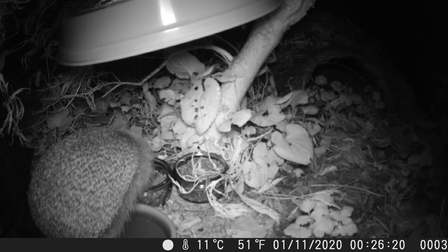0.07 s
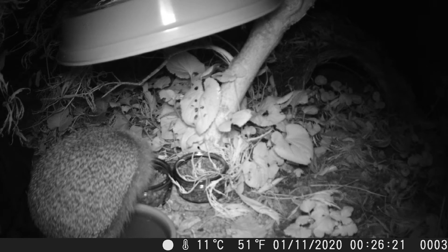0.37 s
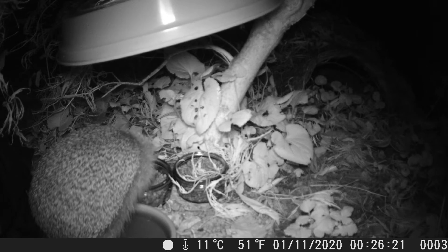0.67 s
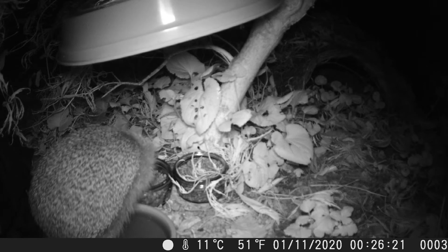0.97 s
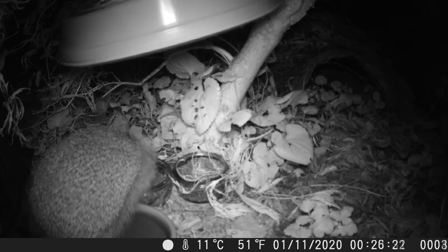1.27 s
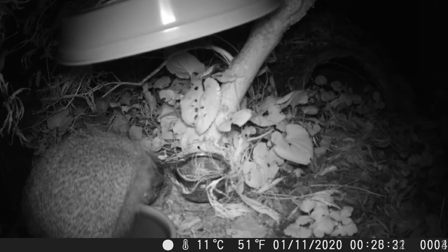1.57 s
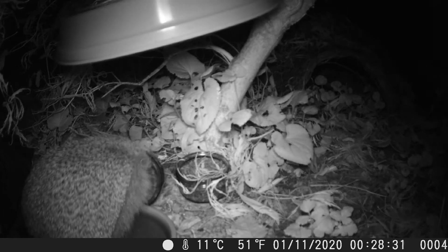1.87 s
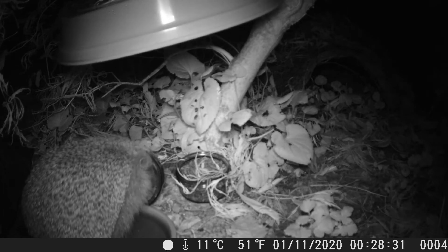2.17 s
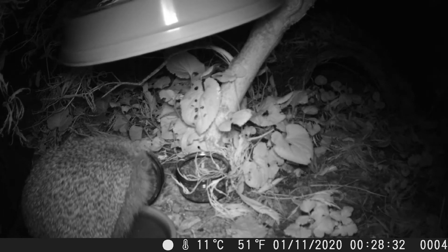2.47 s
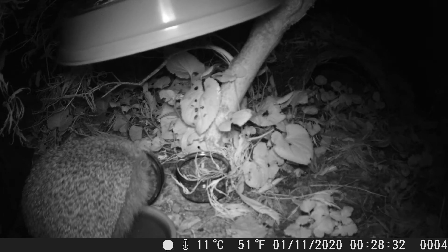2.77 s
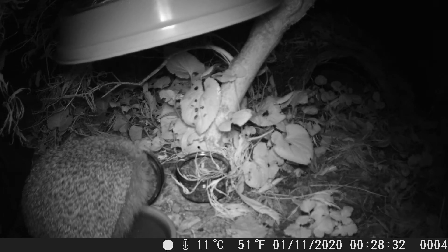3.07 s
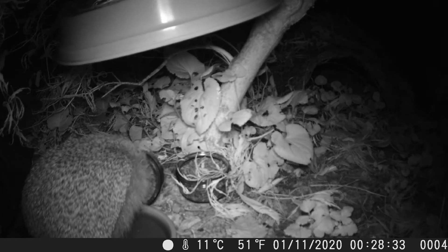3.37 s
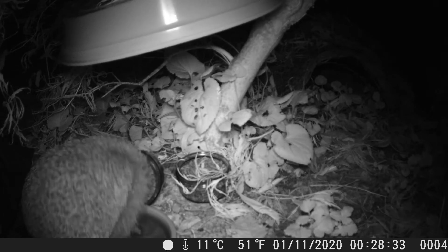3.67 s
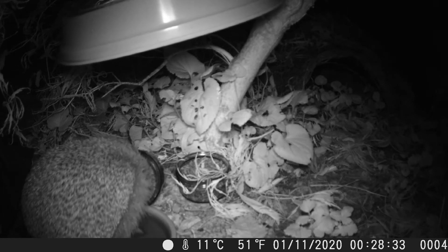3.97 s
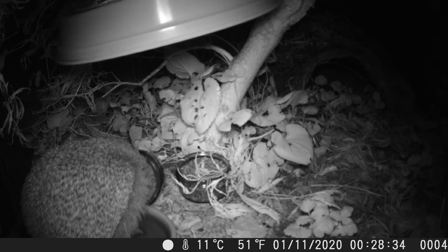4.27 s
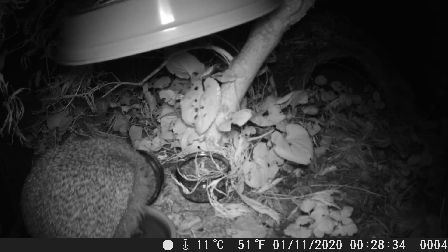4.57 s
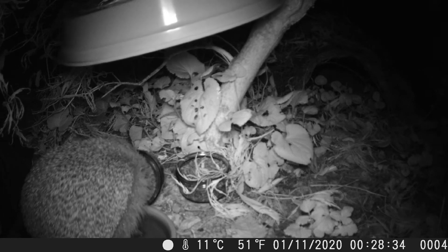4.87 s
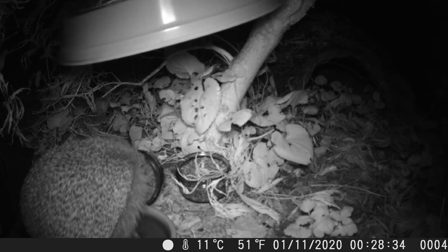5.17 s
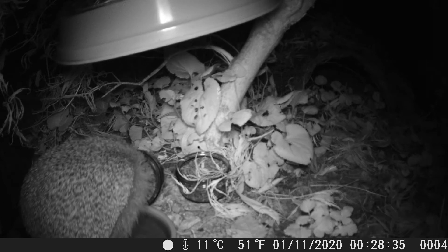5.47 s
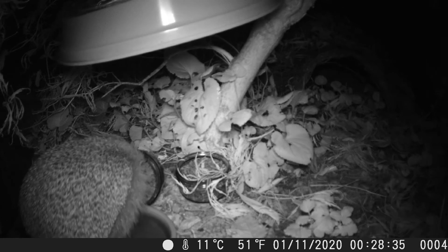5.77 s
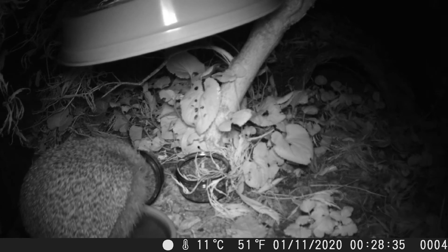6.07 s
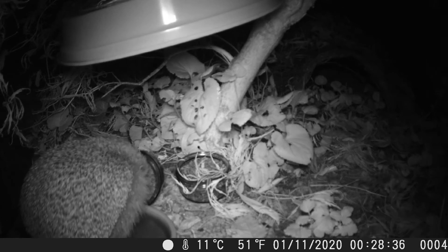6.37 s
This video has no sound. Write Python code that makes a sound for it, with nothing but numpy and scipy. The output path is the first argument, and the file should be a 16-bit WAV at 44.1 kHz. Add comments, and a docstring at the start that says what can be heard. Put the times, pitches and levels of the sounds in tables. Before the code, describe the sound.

A very quiet night garden is heard through a trail camera's microphone, with wavering low rumble and smooth hiss throughout. From the start, the camera's electronics make a soft thump and short buzz five times a second, with barely audible high peeps coming and going. A hedgehog feeds with tiny, irregular, high crunches and smacks, the sharpest at about 2.2, 2.7 and 3.4 seconds. Everything dips slightly around 1.3 seconds. From 1.7 to 3.5 seconds, deep, dull buffets hit the microphone, strongest near 2.3 seconds. Faint, brief hollow notes, like a nudged bowl, cluster from 2.3 to 3.2 seconds and return now and then. One bite ends in a tiny squeak at 3.4 seconds. From about 4 seconds the buzzes grow longer and repeatedly sink to a thinner, lower whine, while the pulsing and nibbling continue to the end at about 6.5 seconds.

```python
"""A trail camera watches a hedgehog at its food bowl in a still night garden, over rumble and hiss.
From the start the hedgehog makes tiny crunches and the camera's current draw leaks into its microphone:
a soft thump and a short buzz five times a second, with a thin peep on a clock of its own.
After a brief dip in level, low buffets come in at 1.7 s, then faint hollow notes; at 3.4 s a bite squeaks.
From about 4 s on, the buzz sinks to a whine whenever the writing of a picture stalls."""
import sys
import numpy as np
from scipy import signal
from scipy.fft import rfft, irfft
from scipy.io import wavfile
from scipy.ndimage import uniform_filter1d

SR = 44100
rng = np.random.default_rng(int(sys.argv[2]) if len(sys.argv) > 2 else 0)


def put_to_file(sound):
    """Save the sound as 16-bit audio at rate SR, in the file named by the first command-line argument."""
    columns = np.atleast_2d(sound).T  # one column per channel
    safe = np.clip(columns, -1, 1)
    whole_steps = np.round(safe * 32767)
    wavfile.write(sys.argv[1], SR, whole_steps.astype(np.int16))


N = 287091
TIME = np.arange(N) / SR


def undb(db):
    """Decibels to gain."""
    return 10 ** (np.asarray(db) / 20)


def unit_rms(x):
    """Scale to rms 1."""
    return x / np.sqrt(np.mean(x ** 2))


def automation(points):
    """Join (time_s, value) points by straight ramps."""
    return np.interp(TIME, *np.transpose(points))


def add(out, start_s, sound):
    """Mix a sound into out at start_s."""
    i = max(int(start_s * SR), 0)
    out[i:i + len(sound)] += sound[:max(N - i, 0)]


def resonate(x, hz, width_hz):
    """Two-pole band-pass, gain 1 at the centre."""
    return signal.lfilter(*signal.iirpeak(hz, hz / width_hz, fs=SR), x)


def noise(eq):
    """Noise of rms 1, coloured by (freq_hz, gain_db) points."""
    hz, db = np.transpose(eq)
    bins_hz = np.maximum(np.fft.rfftfreq(N, 1 / SR), 1)
    gain = undb(np.interp(np.log(bins_hz), np.log(hz), db))
    return unit_rms(irfft(rfft(rng.standard_normal(N)) * gain, N))


def wobble(rate_hz):
    """Random modulator of rms 1: sample and hold, smoothed twice."""
    hold = int(SR / rate_hz)
    steps = np.repeat(rng.standard_normal(N // hold + 1), hold)
    return unit_rms(uniform_filter1d(uniform_filter1d(steps, hold), hold)[:N])


def gate(start_s, end_s, edge_s):
    """Open between start and end, with a fade at each edge."""
    return np.clip(np.minimum(TIME - start_s, end_s - TIME) / edge_s, 0, 1)


def during(events, edge_s):
    """A gate that opens for each (start_s, length_s, ...) event."""
    return sum(gate(start, start + length, edge_s) for start, length, *_ in events)


def note(length_s, hz, fall):
    """A sine that swells and fades while it sinks by the share `fall` of its pitch."""
    progress = np.linspace(0, 1, int(length_s * SR))
    glide_hz = hz * (1 - fall * (progress - .5))
    return np.sin(np.pi * progress) ** 2 * np.sin(2 * np.pi * np.cumsum(glide_hz) / SR)


# EQ curves of the rumble and the hiss: freq_hz, gain_db
RUMBLE_EQ = [(10, -1), (20, 1.7), (32, 1), (50, -3.5), (65, -6.5), (85, -4), (120, -18), (170, -16.2),
             (215, -24.5), (260, -23), (400, -34.5), (700, -40), (1500, -66)]
HISS_EQ = [(100, -0.5), (500, 1.5), (1000, -4), (1800, -7.5), (2900, -11.4), (3220, -20), (3430, -15),
           (4100, -16.5), (4600, -19), (5100, -20), (6400, -20), (6900, -15), (7300, -25)]
# Fader ride on the rumble: time_s, level_db
RUMBLE_RIDE = [(0, -50.5), (.8, -51.8), (2.5, -50.6), (3.8, -51), (4.6, -50), (5.3, -50.5), (6.5, -48.8)]

def background(waver_db=1.2, hiss_db=-69.2):
    """The bed: wavering low rumble and smooth microphone hiss."""
    rumble = noise(RUMBLE_EQ) * undb(automation(RUMBLE_RIDE) + waver_db * wobble(9))
    return rumble + noise(HISS_EQ) * undb(hiss_db)


# Sub-heavy EQ curve of the buffets: freq_hz, gain_db
BUFFET_EQ = [(12, -5), (20, 3.5), (42, -1.5), (70, -11), (100, -19.5), (160, -41), (300, -77), (2000, -120)]
# Low buffets on the housing: peak_s, level_db
BUFFET_HITS = [(1.705, -49), (1.925, -47), (2.13, -36), (2.23, -36), (2.32, -29.3), (2.41, -41),
               (2.56, -47), (2.78, -47), (2.89, -37.5), (2.965, -35.8), (3.11, -44.5), (3.23, -49.5),
               (3.42, -48.5)]

def buffets(attack_s=.025, hold_s=.05, decay_s=.042):
    """Deep, dull knocks that swell, hold and die away, perhaps the animal jostling the camera's stand."""
    shake = noise(BUFFET_EQ)
    shake = shake / np.sqrt(uniform_filter1d(shake ** 2, SR // 12))  # levelled before the envelopes
    power = 0
    for peak_s, db in BUFFET_HITS:
        attack = np.clip(1 + (TIME - peak_s) / attack_s, 0, 1)
        release = np.exp(-np.maximum(TIME - peak_s - hold_s, 0) / decay_s)
        power = power + (undb(db) * attack * release) ** 2
    return shake * np.sqrt(power)


# Faint hollow notes: start_s, pitch_hz, level_db
HOLLOW_CUES = [(2.31, 685, -65.5), (2.42, 695, -70.5), (2.516, 690, -69.5), (2.635, 690, -67.5),
               (2.785, 690, -70), (2.815, 695, -72), (3.04, 690, -71.5), (3.127, 690, -69),
               (3.228, 710, -69), (3.852, 700, -69.5), (4.914, 675, -65), (5.523, 705, -66.5),
               (5.617, 695, -64), (6.193, 690, -65.5), (6.229, 685, -70), (6.32, 711, -60.5)]

def hollow_notes(length_s=.049, fall=.069, upper_ratio=1.2, upper_db=-10.5):
    """Two close resonances swell and fade together, perhaps the bowl as it is nudged."""
    out = np.zeros(N)
    for start_s, hz, db in HOLLOW_CUES:
        upper = undb(upper_db) * note(length_s, hz * upper_ratio, fall)
        add(out, start_s, undb(db) * (note(length_s, hz, fall) + upper))
    return out


# Peeps on a 0.216 s beat, with gaps: start_s, level_db
PEEP_CUES = [(.211, -88), (.436, -88), (.649, -84.5), (.862, -85.5), (1.08, -88), (1.93, -87),
             (2.147, -86.5), (2.362, -84.5), (2.584, -85), (2.798, -85), (3.015, -89), (3.231, -87),
             (3.445, -87), (3.658, -86), (3.878, -86), (4.095, -88.5), (5.173, -83), (6.036, -86),
             (6.25, -84.5), (6.464, -86)]

def peeps(length_s=.036, pitch_hz=5470):
    """Thin peeps of one pitch, probably from the camera's electronics."""
    out = np.zeros(N)
    for start_s, db in PEEP_CUES:
        add(out, start_s, undb(db) * note(length_s, pitch_hz, fall=.022))
    return out


def squeak(start_s=3.444, length_s=.018, pitch_hz=4940, level_db=-71):
    """One bite ends in a tiny high squeak as the food gives way."""
    out = np.zeros(N)
    add(out, start_s, undb(level_db) * note(length_s, pitch_hz, fall=.053))
    return out


# Cracks and soft smacks of the hedgehog feeding: start_s, peak_db, brightness_hz, crumble_s
BITES = [(.0667, -67.5, 3930, .0015), (.2977, -65.5, 4250, .001), (.829, -69.5, 4150, .008),
         (1.1992, -71, 4700, .003), (1.3695, -70, 4850, .002), (1.439, -69, 4950, .003),
         (1.5703, -71, 4200, .001), (1.6202, -70, 4650, .006), (1.712, -68.5, 4900, .003),
         (1.9116, -72.5, 4900, .003), (2.1375, -69, 4650, .0015), (2.1607, -50.5, 4300, .0003),
         (2.3236, -72.5, 4650, .002), (2.3376, -66, 4300, .001), (2.367, -71.5, 4700, .004),
         (2.4034, -72, 4200, .002), (2.618, -70.5, 4750, .008), (2.6876, -58, 4150, .0003),
         (2.8799, -72, 4600, .002), (3.2241, -68.5, 3750, .0015), (3.4356, -57.5, 4300, .0005),
         (3.8107, -68, 4850, .002), (4.3221, -72.5, 4970, .002), (4.6064, -71.5, 4700, .002),
         (4.7062, -70.5, 4400, .001), (4.9357, -72.5, 4600, .002), (5.0549, -70.5, 5000, .003),
         (5.1262, -70, 5000, .003), (5.7653, -71.5, 4600, .003), (5.8047, -69.5, 4000, .001),
         (6.0038, -64, 4250, .0005), (6.2173, -69.5, 4900, .002), (6.2487, -64.5, 3950, .0005),
         (6.4333, -67.5, 4300, .001)]
# High resonances that each bite rings: centre_hz, width_hz, gain_db
BITE_RESONANCES = [(3750, 300, -1), (4130, 450, -1.5), (4610, 200, 3.5)]

def crunches(splinter_gain=.066, band_hz=1200, top_hz=4950):
    """Food snaps, then splinters swell and fade: briefly for a crack, longer for a soft smack."""
    out, t = np.zeros(N), TIME[:SR // 15]
    for start_s, db, bright_hz, crumble_s in BITES:
        crumble = t / crumble_s * np.exp(1 - t / crumble_s)
        splinters = splinter_gain * rng.standard_normal(len(t)) * crumble
        edges_hz = [bright_hz - band_hz / 2, min(bright_hz + band_hz / 2, top_hz)]
        band = signal.butter(4, edges_hz, "band", fs=SR, output="sos")
        snap = signal.sosfilt(band, (t == 0) + splinters)
        ring = sum(undb(gain_db) * resonate(snap, hz, width) for hz, width, gain_db in BITE_RESONANCES)
        add(out, start_s, undb(db) * ring / np.abs(ring).max())
    return out


def supply_ripple(hz, partials):
    """The tone of whine and buzz: a train of narrow dips in the supply, one per block of data."""
    phase = 2 * np.pi * np.cumsum(hz) / SR
    return unit_rms(sum(-undb(db) * np.cos(harmonic * phase) for harmonic, db in partials))


# Stalls in the long writes, where data slows and less current flows: start_s, length_s, pitch_hz
WRITE_STALLS = [(4.162, 0.036, 482), (4.323, 0.042, 480), (4.521, 0.053, 474), (4.765, 0.019, 475),
                (4.784, .022, 405), (4.946, 0.063, 414), (5.326, .026, 412), (5.353, .024, 475),
                (5.547, .039, 482), (5.751, 0.04, 480), (5.957, 0.05, 478), (6.293, 0.053, 470)]
# Timbre of the whine: harmonic, gain_db
WHINE_PARTIALS = [(1, 0.5), (2, -5), (3, -12.5)]

def whine(level_db=-68, jitter=.018, overlap_s=.006):
    """In a stall the slower blocks make a thinner, lower tone than the buzz."""
    waver = 1 + jitter * wobble(70)
    out = np.zeros(N)
    for start_s, length_s, hz in WRITE_STALLS:
        envelope = gate(start_s - overlap_s, start_s + length_s + overlap_s, edge_s=.007)
        out += envelope * supply_ripple(hz * waver, WHINE_PARTIALS)
    return undb(level_db) * out


# Bursts of current as the camera stores pictures: start_s, length_s, end_surge_x_load, buzz_trim_db
WRITE_BURSTS = [(.109, .082, .9, .5), (.307, .066, 1.5, .5), (.492, .035, .87, .5), (.692, .043, 1, .3),
                (.903, .051, .9, .3), (1.105, .083, .8, -.5), (1.308, .062, .9, .5), (1.509, .031, .2, 1.2),
                (1.708, .051, .6, 1.2), (1.908, .048, .6, .6), (2.096, .044, 1.1, .3),
                (2.29, .048, .4, -.3), (2.501, .044, .5, -.5), (2.709, .031, .34, .8),
                (2.918, .041, .4, .6), (3.111, .078, 1.1, .4), (3.316, .071, 1.4, .3), (3.492, .03, .5, .6),
                (3.707, .044, .5, -.3), (3.911, .049, .9, .3), (4.11, .028, .3, .5), (4.162, .09, .43, .3),
                (4.307, .112, .68, -.6), (4.509, .087, 1.3, .3), (4.709, .113, 1.4, -.3),
                (4.89, .11, .57, .3), (5.096, .054, 1.1, -.3), (5.314, .098, 1.3, -.4),
                (5.511, .098, 1.5, .4), (5.707, .11, 1.4, .3), (5.909, .108, 1.5, .4),
                (6.092, .046, .9, .3), (6.291, .106, .9, -.3)]
# Timbre of the buzz: harmonic, gain_db
BUZZ_PARTIALS = [(1, 2.3), (2, -2.9), (3, -8), (4, -21), (5, -26.5), (6, -23)]

def buzz(pitch_hz=568, level_db=-67, jitter=.0138, flutter_db=1.8,
         grit_db=-7.2, inrush_db=-5, inrush_s=.004):
    """The inrush opens each write with a spit of noise; data blocks follow at a slightly uneven pace."""
    envelope, inrush = np.zeros(N), np.zeros(N)
    for start_s, length_s, _, trim_db in WRITE_BURSTS:
        envelope += undb(trim_db) * gate(start_s, start_s + length_s, edge_s=.0013)
        add(inrush, start_s, undb(trim_db + inrush_db) * np.exp(-TIME[:SR // 30] / inrush_s))
    envelope *= 1 - during(WRITE_STALLS, edge_s=.002)
    tone = supply_ripple(pitch_hz * (1 + jitter * wobble(220)), BUZZ_PARTIALS)
    tone *= undb(flutter_db * wobble(160))
    grit = noise([(100, -3), (400, 3), (1200, -5.5), (2500, -9.5), (6000, -26.5)])
    return undb(level_db) * (envelope * tone + (undb(grit_db) * envelope + inrush) * grit)


# Hiccups, where the current cuts out for an instant in mid-write: start_s, depth_x_load
WRITE_HICCUPS = [(.716, 1.3), (.935, 2.2), (2.322, 1.3), (2.939, 1.1), (3.17, 1.6), (3.939, 1.3),
                 (4.238, 1.4), (4.922, 1.6), (5.133, 1.4), (5.392, 2.3), (6.122, 1.7), (6.379, 1.5)]

def thumps(gain_db=-42.5, body_db=-1, tick_db=-13.3, surge_s=.0033, hiccup_s=.0028, stall_relief=.9):
    """Each write sags the supply, and every step in the load swings the microphone's coupling circuit."""
    load = np.zeros(N)
    for start_s, length_s, surge, _ in WRITE_BURSTS:
        remaining_s = np.arange(int(length_s * SR))[::-1] / SR
        add(load, start_s, 1 + surge * np.exp(-remaining_s / surge_s))
    for start_s, depth in WRITE_HICCUPS:
        add(load, start_s, -depth * np.exp(-TIME[:SR // 30] / hiccup_s))
    load -= stall_relief * during(WRITE_STALLS, edge_s=.001)
    load = uniform_filter1d(load, size=28)  # the supply capacitor rounds each step
    sub = resonate(load, hz=23, width_hz=20)
    body = undb(body_db) * resonate(load, hz=58, width_hz=75)
    tick = undb(tick_db) * resonate(load, hz=260, width_hz=330)
    return undb(gain_db) * (sub + body + tick)


# Fader ride on the whole mix: time_s, gain_db
MASTER_RIDE = [(0, -.5), (.9, -1), (1.25, -4), (1.55, -3.2), (1.8, -1)]

def scene(note_flutter_db=2.4):
    """Everything meets in one microphone; the level dips briefly early on."""
    camera = thumps() + buzz() + whine()
    notes = (hollow_notes() + peeps() + squeak()) * undb(note_flutter_db * wobble(250))
    mix = camera + notes + crunches() + buffets() + background()
    return (mix * undb(automation(MASTER_RIDE)))[None]


def record(dry, cutoff_hz=7350):
    """The camera cuts off the top end with a steep low-pass."""
    return signal.sosfilt(signal.ellip(10, .2, 70, cutoff_hz, fs=SR, output="sos"), dry)


dry = scene()
out = record(dry)
put_to_file(out)
```